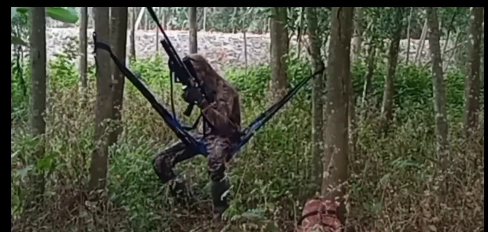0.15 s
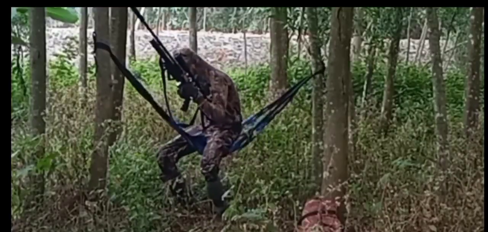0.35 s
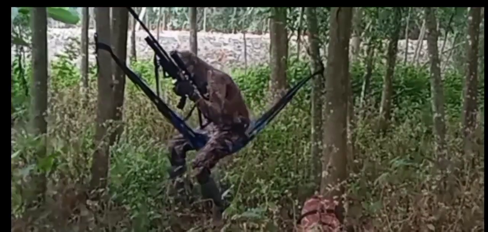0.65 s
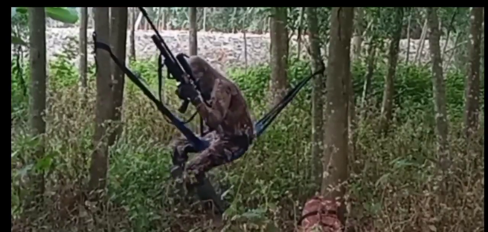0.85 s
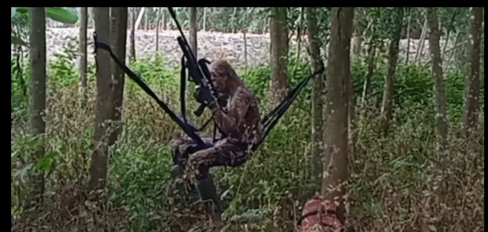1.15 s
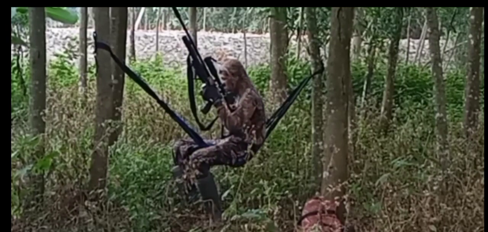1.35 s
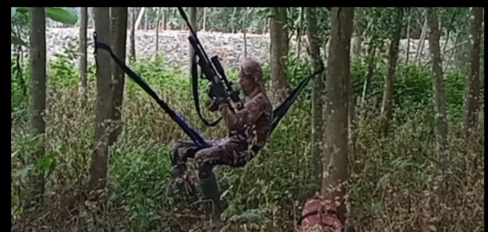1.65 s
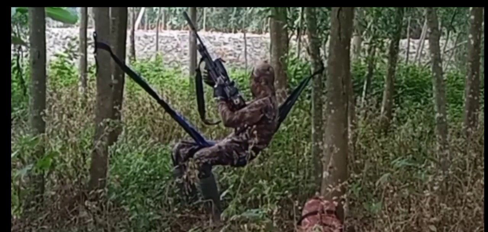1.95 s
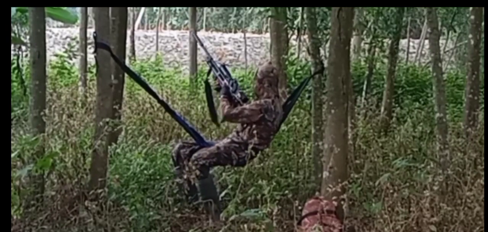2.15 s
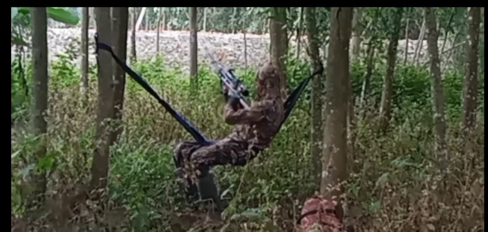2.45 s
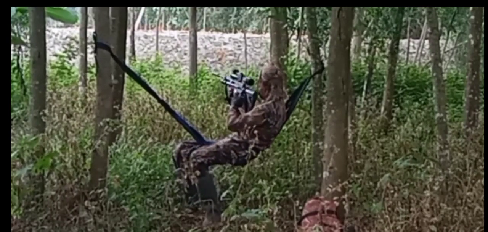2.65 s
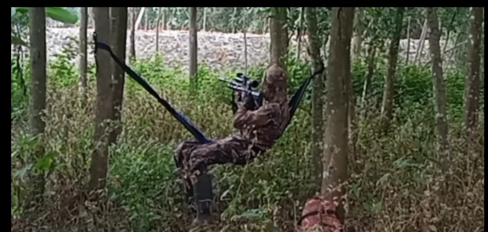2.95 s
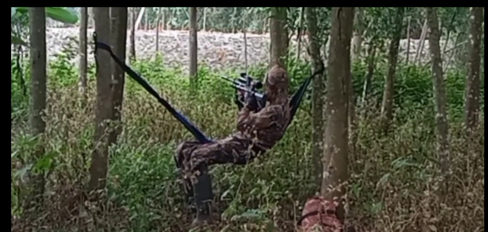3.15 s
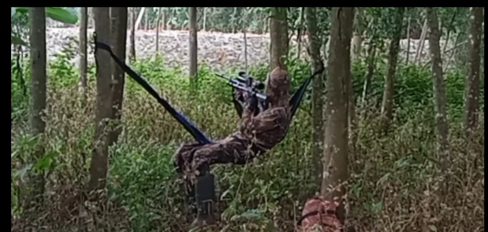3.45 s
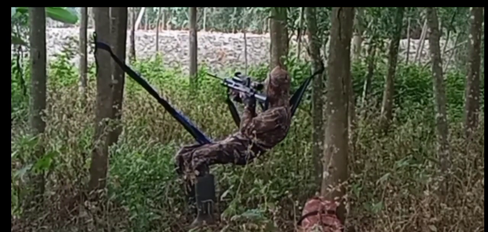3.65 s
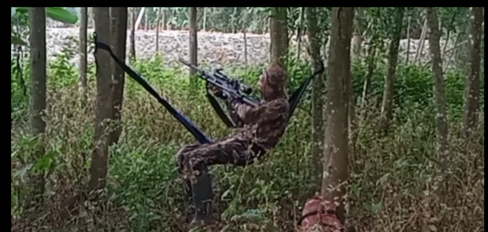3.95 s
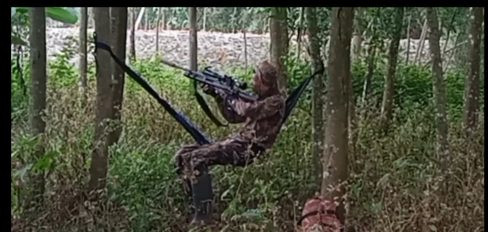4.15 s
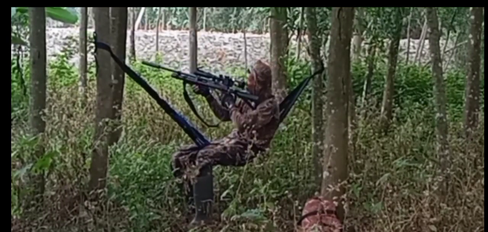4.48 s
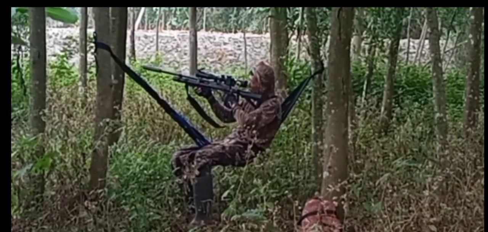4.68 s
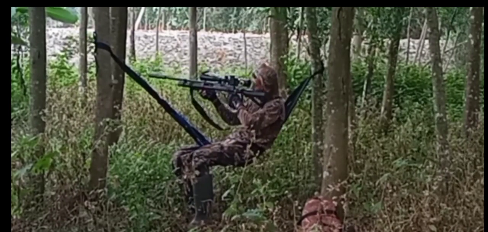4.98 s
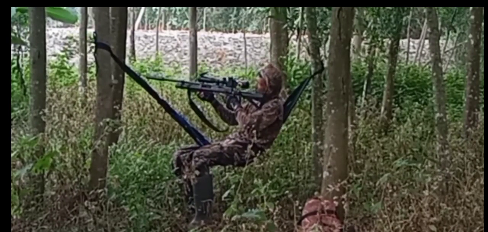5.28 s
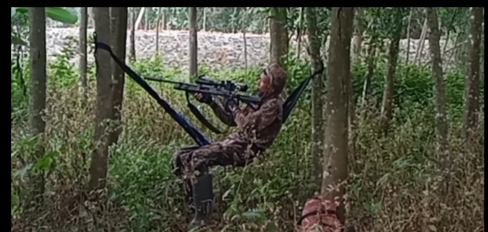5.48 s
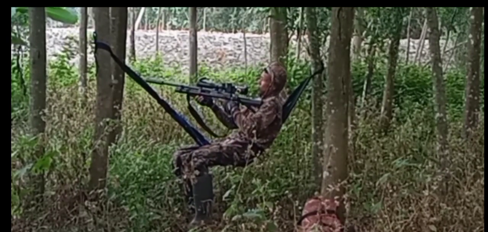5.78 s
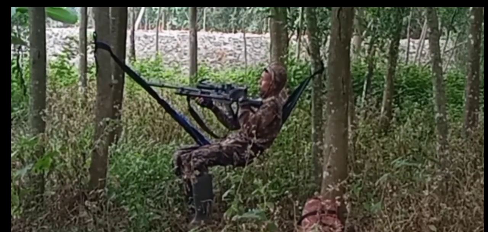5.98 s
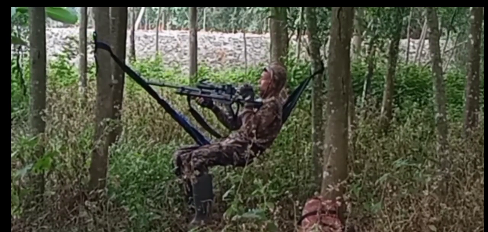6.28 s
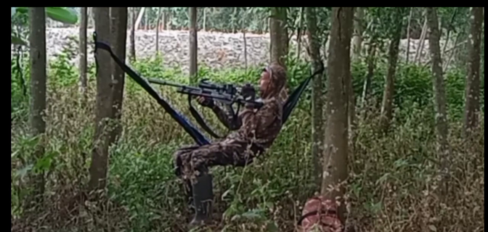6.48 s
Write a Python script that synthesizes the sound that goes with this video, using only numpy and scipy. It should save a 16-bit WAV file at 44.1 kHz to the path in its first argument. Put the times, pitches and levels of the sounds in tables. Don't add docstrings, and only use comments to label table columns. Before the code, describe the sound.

For about 6.6 seconds, an afternoon wood shimmers with far crickets chirping out of step and high katydid hiss, the insects leaning left. From a lure loudspeaker come low, rolling dove coos, each nearly half a second of rapid purring pulses near 500 Hz, with the overdriven cone cracking and rattling. They start at about 0.6, 1.6 and 2.6 s, then 3.5, 4.5 and 5.5, with a new round beginning near 6.5; the third of each round is harshest. A bird's echo fades at the start; its clear falling chirp sounds at 0.45 s, louder at 3.5, then mostly as echo at 4.9. Faint warblers twitter mainly through the first 4.5 s, and a distant dove murmurs near 4.3. A nearer cricket chirps on the left from 1.2 to 5.3 s, returning at 6.3. Dry leaves rustle briefly around 2.6. Soft low wind bumps the microphones, with leaf hush and trunk echoes.

```python
import sys
import numpy as np
from scipy import signal
from scipy.fft import rfft, irfft, next_fast_len
from scipy.io import wavfile
from scipy.ndimage import uniform_filter1d

SR = 44100
rng = np.random.default_rng(int(sys.argv[2]) if len(sys.argv) > 2 else 0)


def materialize(psi):
    bounded = np.clip(np.atleast_2d(psi).T, -1, 1)
    quanta = np.round(bounded * 32767).astype(np.int16)
    wavfile.write(sys.argv[1], SR, quanta)


def rack_gain(trim_db):
    fader = np.asarray(trim_db, float)
    return 10 ** (fader / 20)


N = 291942


def lure():
    round_starts = [
        -2.9025,
        0,
        2.9025,
        5.828,
    ]
    arch_up_s, arch_down_s = 0.0037, 0.0053
    right_lead_s, right_voice_db, right_crack_db = 0.00078, -4, -8.5
    t = np.arange(-.012, .042, 1 / SR)
    arch = np.exp(-((t + 0.0015) / np.where(t < -.0012, arch_up_s, arch_down_s)) ** 2)
    settle = rise(t / 0.026)
    shape = rise((t + 0.0086) / 0.0061) * rise((.039 - t) / 0.014)
    voice, cone = np.zeros((2, 4 * SR))
    pulses = dove_pulses()
    chances = rng.random(size=(len(pulses), 4))
    for pulse, (turn, detune, height, edge) in zip(pulses, chances):
        s, puff_db, body_db, crack_db, climb_hz = pulse
        effort = np.clip((puff_db + 47) / 26, 0, 1)
        arch_hz = (70 + 25 * height - 0.54 * climb_hz) * effort * arch
        hz = 479 + climb_hz - 850 * t + arch_hz + 16 * (detune - .5)
        phase = 2 * np.pi * (np.cumsum(hz) / SR + turn)
        puff_to_body_db = (1 - settle) * (puff_db + 2.13) + settle * (body_db + 3.0)
        level = shape * rack_gain(puff_to_body_db - 181 * t)
        third, fifth = np.cos(3 * phase), np.cos(5 * phase)
        burst = rack_gain(crack_db - 2.14) * np.exp(-((t - .0005) / 0.0026) ** 2)
        crack = burst * (third + rack_gain(-9 + 10 * edge) * fifth)
        mild = rack_gain(-40 + 11.2 * detune) * rise(t / 0.05) * level * third
        add(voice, s + t[0], level * np.cos(phase))
        add(cone, s + t[0], crack + mild)
    rattle = signal.lfilter(*signal.butter(1, 600, fs=SR), rng.standard_normal(len(cone)))
    cone += rack_gain(-27.0) * uniform_filter1d(np.abs(voice), size=400) * rattle
    voice += rack_gain(-10) * trees(voice, t60=0.068, gap_s=0.0018)[0]
    voice += rack_gain(-21.5) * trees(voice, t60=0.26, gap_s=0.085)[0]
    cone += rack_gain(-4.5) * trees(cone, t60=0.13, gap_s=0.0013)[0]
    before, lead = 3 * SR, round(right_lead_s * SR)
    sound = np.zeros((2, N + 7 * SR))
    for s in round_starts:
        add(sound[0], s + before / SR, voice + cone)
        add(sound[1], s + before / SR, rack_gain(right_voice_db) * voice + rack_gain(right_crack_db) * cone)
    return np.array([sound[0, before:][:N], sound[1, before + lead:][:N]])


def dove_pulses():
    # first_full_pulse_s, full_pulses, pulse_gap_s, faint_crack_db, last_pulse_db
    coos = [
        (.63, 12, .0389, -55.5, -5.5),
        (1.612, 11, .0387, -61, -7.5),
        (2.621, 11, .0387, -53, -12.5),
    ]
    # start_s, crack_db
    overdriven = [(.63, -37.5), (.673, -40.5), (.714, -47.5), (.755, -37.5), (.793, -44), (.832, -41.5),
                  (.871, -39.5), (.987, -46), (1.026, -38), (1.065, -37), (1.612, -40.5), (1.654, -35.5),
                  (1.928, -50.5), (2.622, -33), (2.664, -32.5), (2.705, -34), (2.744, -40), (2.823, -36),
                  (2.86, -49), (2.899, -33), (2.937, -40.5), (2.976, -45), (3.016, -32.5)]
    puff_level_db, body_level_db, body_per_crack, first_body_db = -21.5, -22, 0.19, 1.4
    slow_start_s, settle_pulses, uneven_db = .008, 1.58, 1
    lead_s, lead_puff_db, lead_body_db = .038, -11, -9.5
    close_s, close_puff_db, close_body_db, last_s = 0.022, -10, 4, .045
    climb_hz_per_s = 32.7
    crack_s, crack_db = np.transpose(overdriven)
    rows = []
    for first, pulses, gap, faint_db, last_db in coos:
        k = np.arange(round(pulses))
        s = first + gap * k + slow_start_s * (1 - np.exp(-k / settle_pulses))
        nearest = np.abs(s[:, None] - crack_s).argmin(1)
        cracks = np.abs(s - crack_s[nearest]) < gap / 2
        crack = np.where(cracks, crack_db[nearest], faint_db)
        puff_wobble, body_wobble = uneven_db * (2 * rng.random(size=(len(k), 2)).T - 1)
        body = body_level_db + body_per_crack * (crack + 45) + first_body_db * (k == 0) + body_wobble
        rows += zip(s, puff_level_db + puff_wobble, body, crack, climb_hz_per_s * (s - first))
        top_hz = climb_hz_per_s * (s[-1] - first)
        rows += [
            (first - lead_s, puff_level_db + lead_puff_db, body_level_db + lead_body_db, -70, 0),
            (s[-1] + close_s, puff_level_db + close_puff_db, body_level_db + close_body_db, -75, top_hz),
            (s[-1] + last_s, puff_level_db + last_db, body_level_db + last_db - 4, -75, top_hz)]
    return rows


def crickets():
    # start_s, wing_strokes, level_db
    near_chirps = [(1.183, 3, -35), (1.387, 3, -36), (1.591, 3, -34), (1.792, 3, -35), (2.023, 3, -35.5),
                   (2.255, 3, -36), (2.455, 3, -35.5), (2.687, 3, -35), (2.92, 2, -35.5), (3.154, 2, -35.5),
                   (3.416, 1, -33.5), (3.584, 3, -37), (3.841, 3, -29.5), (3.853, 2, -38), (4.04, 3, -33.5),
                   (4.086, 2, -35), (4.235, 3, -32.5), (4.283, 3, -35.5), (4.46, 3, -33), (4.55, 2, -32.5),
                   (4.751, 4, -33.5), (5.045, 2, -33.5), (5.118, 2, -40), (5.282, 1, -34.5),
                   (6.313, 3, -32.5), (6.55, 3, -33.5)]
    # time_s, level_db
    chorus = [(0, -48), (.66, -45.5), (2.5, -47.5), (2.909, -45.5), (3.6, -48.5), (3.8, -45.5),
              (4.3, -47.5), (5.2, -46.5), (6.62, -45)]
    stroke_gap_s, stroke_spread_db = .0325, 3
    near, far = np.zeros(N), np.zeros((2, N + SR))
    for s, strokes, db in near_chirps:
        for k in range(round(strokes)):
            stroke_db = db + 2.5 + stroke_spread_db * rng.uniform(-1.12, 1)
            add(near, s - .012 + k * stroke_gap_s, rack_gain(stroke_db) * stroke(1))
    trains = np.zeros((2, 4, N + SR))
    for k, (start, period, size) in enumerate(rng.random(size=(48, 3))):
        loudness = rack_gain(12.5 * size)
        gaps_s = .19 + .05 * period + .03 * rng.random(size=42)
        chirps_s = np.cumsum(gaps_s) - .25 * start
        strokes_s = chirps_s[:, None] + np.array([0, .033, .066])
        at = (strokes_s + .003 * rng.random(size=(42, 3))).ravel()
        at = at[(at > 0) & (at < N / SR + 1)]
        trains[k % 2, k // 2 % 4, (at * SR).astype(int)] = loudness
    for k, tune in enumerate([.98, 1.0, 1.02, 1.04]):
        far += signal.oaconvolve(trains[:, k], stroke(tune)[None], axes=1)[:, :N + SR]
    far = rack_gain(-0.5) * far + trees(far.sum(0), t60=1.0, gap_s=0.0023)
    far = far[:, SR // 2:][:, :N]
    level = rack_gain(np.interp(np.arange(N) / SR, *np.transpose(chorus)))
    far = evened(far) * level * rack_gain([[5.5], [-1]])
    near_echo = rack_gain([[-5], [-11]]) * trees(near, t60=0.38, gap_s=0.011)
    return far + near * rack_gain([[0], [-12]]) + near_echo


def stroke(tune):
    hz = tune * np.linspace(5330, 4230, round(0.0215 * SR))
    return glide(hz) * signal.windows.tukey(len(hz), .8)


def katydids():
    # pitch_hz, width_hz, left_db, right_db
    wings = [
        (6395, 413, -50, -64),
        (7230, 200, -67, -83),
        (10004, 1077, -74, -57),
        (15200, 1300, -82, -84.5),
    ]
    # throbs_per_s, depth (0-1)
    throbs = [(32, 0.27), (26, 0.3), (42.6, 0.17), (37.7, 0.2)]
    out, t = np.zeros((2, N)), np.arange(N) / SR
    for (hz, width, left_db, right_db), (rate, depth) in zip(wings, throbs):
        band = coloured(lambda f: np.maximum(-6 * np.abs(2 * (f - hz) / width) ** 2.0, -90), channels=2)
        turn = 2 * np.pi * rate * t
        triplet = 0.59 * np.cos(turn) + 0.56 * np.cos(2 * turn + 1) + 0.31 * np.cos(3 * turn + 2)
        throb = 1 + depth * triplet
        drift = rack_gain(1.14 * evened(uniform_filter1d(rng.standard_normal(N), size=4000)))
        out += rack_gain([[left_db], [right_db]]) * throb * drift * band
    return out


def birds():
    # start_s, length_s, middle_hz, level_db, echo_db
    falling = [
        (-.16, 0.094, 6390, -36.5, 5.5),
        (0.448, .09, 6594, -28.5, 0.5),
        (3.471, 0.066, 6580, -27.5, 3),
        (4.923, .03, 6320, -62, 30.5),
    ]
    echo_tilts = [2.4, 12.7, 4.2, 1.8]
    # share_of_length, pitch_over_middle, level_db
    course = [(0, 1.225, -34), (.07, 1.18, -10.5), (.36, 1.065, -6.5), (0.471, 1.005, 3.5),
              (0.601, .985, 0.5), (0.701, .88, -6.5), (1.0, .74, -20)]
    # start_s, length_s, pitch_hz, level_db
    warbles = [(0.684, 0.037, 3440, -54), (0.703, 0.051, 3024, -45.5), (.78, 0.066, 2790, -50),
               (1.017, 0.041, 3210, -50), (1.08, 0.07, 2635, -49), (1.186, 0.12, 2590, -62.5),
               (1.27, 0.043, 2820, -52.5), (1.459, 0.041, 2430, -58), (1.539, 0.028, 3120, -49),
               (1.563, 0.036, 2555, -43.5), (1.8, 0.029, 3156, -49.5), (1.851, 0.039, 2870, -50),
               (1.908, 0.024, 2685, -56.5), (1.912, 0.078, 1970, -64), (2.065, 0.035, 2874, -54),
               (2.293, 0.042, 3140, -50.5), (2.335, 0.044, 2840, -57.5), (2.569, 0.074, 3210, -54),
               (3.112, 0.054, 1846, -62), (3.239, 0.091, 3055, -56), (3.375, 0.079, 2700, -57.5),
               (3.48, 0.04, 2810, -49), (3.553, .055, 2940, -56), (4.13, 0.051, 2930, -66),
               (4.224, 0.056, 685, -62), (4.334, .08, 590, -62), (4.398, 0.11, 675, -64.5),
               (4.351, 0.041, 2474, -53.5), (4.462, 0.039, 2570, -44), (4.936, 0.037, 3520, -66)]
    fall_base_hz, fall_from_hz, fall_share = 71.5, 2520, 0.31
    dry_chirps, wet, far = np.zeros(N + SR), np.zeros(N + SR), np.zeros(N)
    at, pitch, course_db = np.transpose(course)
    for (s, length, mid_hz, db, echo_db), tilt_db in zip(falling, echo_tilts):
        u = np.linspace(0, 1, round(length * SR))
        hz, swell_db = mid_hz * np.interp(u, at, pitch), np.interp(u, at, course_db)
        overtone = rack_gain(-33) * rise(1 - 2.3 * u) * glide(2 * hz)
        note = (glide(hz) + overtone) * rack_gain(db + swell_db) * rise(9 * (1 - u))
        flutter = 1 + 0.18 * np.cos(2 * np.pi * 130 * length * u)
        add(dry_chirps, s + 1, note * flutter)
        add(wet, s + 1, note * rack_gain(echo_db + tilt_db * (1 - 2 * u)))
    smear = uniform_filter1d(uniform_filter1d(rng.standard_normal(N), size=220), size=220)
    smear = .5 + evened(smear)
    for s, length, mid_hz, db in warbles:
        fall_hz = fall_base_hz + fall_share * max(mid_hz - fall_from_hz, 0)
        hz = mid_hz + fall_hz * np.linspace(.5, -.5, round(1.21 * length * SR))
        add(far, s, rack_gain(db - 5.0) * glide(hz) * np.hanning(len(hz)))
    echo = trees(wet, t60=0.63, gap_s=0.0049) + rack_gain(-5.0) * trees(wet, t60=0.41, gap_s=0.017)
    near = (dry_chirps + echo)[:, SR:] * rack_gain([[4], [-8]])
    far = far * smear
    far = far + rack_gain(1.5) * trees(far, t60=0.45, gap_s=0.0028)
    return near + far * rack_gain([[3], [-4]])


def air():
    # pitch_hz, level_db (per Hz), left_over_right_db
    hush_colour = [(198, -101, -10.5), (288, -104, 11), (616, -100, 0), (796, -109, 3), (1065, -110, 1),
                   (2000, -109, 9.5), (3780, -110, 5), (5440, -102, 14), (7440, -113, 14.5),
                   (8900, -129, 19.5), (11500, -132, -4), (14000, -131, 19)]
    # pitch_hz, level_db (per Hz)
    wind_colour = [(15, -42), (25, -30), (40, -12), (62, -1), (87, -2), (125, -2.5), (160, -11),
                   (200, -24.5), (300, -44.5)]
    # middle_s, half_length_s, level_db, left_over_right_db
    gusts = [(0, 0.014, -60, 3), (0.356, 0.082, -60, -23), (0.51, 0.031, -51.5, -21),
             (0.591, 0.039, -44, 2), (0.79, 0.092, -65, -1), (1.4, 0.067, -72, -12),
             (1.706, 0.036, -63, -10), (2.125, .09, -62.5, 14), (2.406, 0.078, -67, 20),
             (2.75, 0.18, -65, 4), (3.652, 0.36, -60, 11.5), (4.1, 0.034, -57.5, -18),
             (4.32, 0.14, -54.5, 14.5), (4.747, 0.49, -57.5, 4), (5.196, 0.45, -70, 10),
             (5.513, 0.059, -56.5, 22), (6.62, 0.16, -62.5, 15)]
    # time_s, level_db
    rustle_course = [
        (2.4, -93.5),
        (2.55, -67),
        (2.63, -55.5),
        (2.675, -64),
        (2.69, -100),
    ]
    breeze_db, breeze_lean_db = -65.5, 5.5
    hz, db, lean = np.transpose(hush_colour)
    sides = np.array([db + lean / 2, db - lean / 2]) + 10 * np.log10(SR)

    def hush_db(f):
        return np.array([np.interp(np.log(f + 1), np.log(hz), side, left=-120) for side in sides])

    hush = shaped(hush_db, patchy_db=4.5)
    t = np.arange(N) / SR
    wind_hz, wind_db = np.transpose(wind_colour)
    wind = coloured(lambda f: np.interp(np.log(f + 1), np.log(wind_hz + 1), wind_db, right=-90), channels=3)
    wind = .5 * wind[2] + wind[:2]
    lumps = rack_gain(1.1 * evened(uniform_filter1d(rng.standard_normal((2, N)), size=2500)))
    lean_sides = np.array([[.5], [-.5]])
    gust = rack_gain(breeze_db + breeze_lean_db * lean_sides)
    for s, half, level_db, lean_db in gusts:
        gust = gust + rack_gain(level_db + lean_db * lean_sides) * np.exp(-((t - s) / half) ** 2)
    crackle = rng.standard_normal((2, N)) * rack_gain(2.3 * rng.exponential(1, N))
    crackle = signal.lfilter(*signal.butter(2, [9500, 14800], "band", fs=SR), crackle)
    rustle = evened(crackle) * rack_gain(np.interp(t, *np.transpose(rustle_course), left=-130, right=-130))
    return hush + evened(wind * lumps) * gust + rustle


def trees(x, t60, gap_s):
    taps = np.zeros((2, SR))
    at = np.arange(0, SR - 20, 20) + rng.integers(0, 20, (2, SR // 20 - 1))
    strength = rng.standard_normal(at.shape) * rng.random(at.shape)
    np.put_along_axis(taps, at, strength, 1)
    t = np.arange(SR) / SR
    taps = (taps * rack_gain(-60 * t / t60) * np.clip(t / gap_s, 0, 1))[:, t < t60]
    return signal.oaconvolve(x[None], taps / np.linalg.norm(taps[0]), axes=1)[:, :len(x)]


def shaped(level_db, patchy_db):
    frames, hz = N // 256 + 5, np.fft.rfftfreq(1024, 1 / SR)
    real, imaginary, patches = rng.standard_normal((frames, 513, 2, 3)).T
    patches = uniform_filter1d(uniform_filter1d(patches, size=8, axis=1), size=12, axis=2)
    z = (real + 1j * imaginary) * rack_gain(level_db(hz)[..., None] + patchy_db * evened(patches))
    flat = np.sqrt(np.sum(np.hanning(1024) ** 2) * 2) / 512
    return flat * signal.istft(z, nperseg=1024, noverlap=768)[1][:, :N]


def coloured(level_db, channels):
    size = next_fast_len(N)
    colour = rack_gain(level_db(np.fft.rfftfreq(size, 1 / SR)))
    noise = irfft(rfft(rng.standard_normal((channels, size))) * colour, size)[:, :N]
    return noise / noise.std(1, keepdims=True)


def glide(hz):
    return np.sin(2 * np.pi * np.cumsum(hz) / SR)


def rise(x):
    return np.sin(np.pi / 2 * np.clip(x, 0, 1)) ** 2


def evened(x):
    return x / np.sqrt(np.mean(x ** 2) + 1e-20)


def add(mix, s, sound):
    part = mix[round(s * SR):][:len(sound)]
    part += sound[:len(part)]


def scene():
    return lure() + crickets() + katydids() + birds() + air()


def low_pass(x):
    return signal.sosfilt(signal.butter(12, 17080, fs=SR, output="sos"), x)


def record(dry):
    edge = signal.firwin(511, 15750, window=("kaiser", 9), fs=SR)
    mix = signal.oaconvolve(dry, edge[None], "same")
    return low_pass(mix)


dry = scene()
out = record(dry)
materialize(out)
```